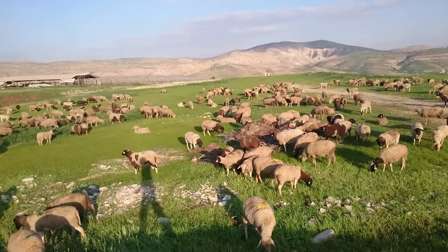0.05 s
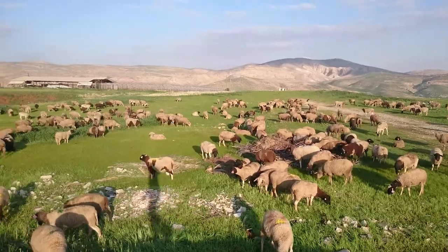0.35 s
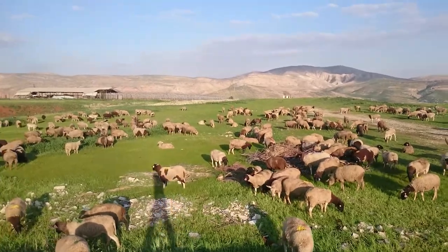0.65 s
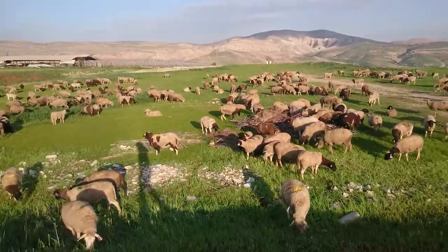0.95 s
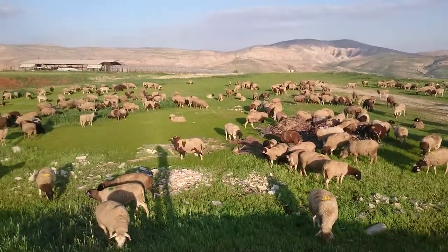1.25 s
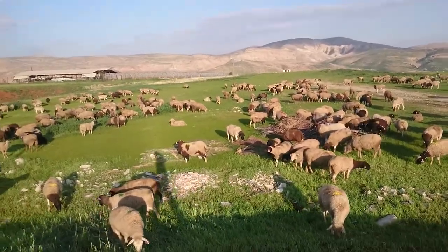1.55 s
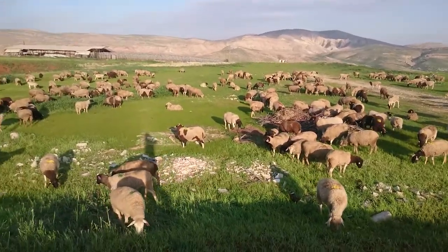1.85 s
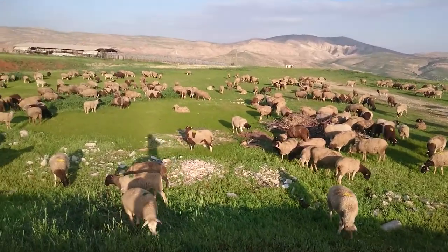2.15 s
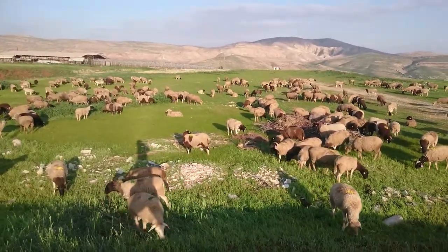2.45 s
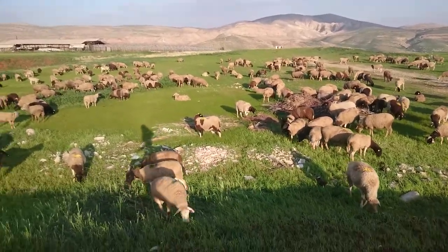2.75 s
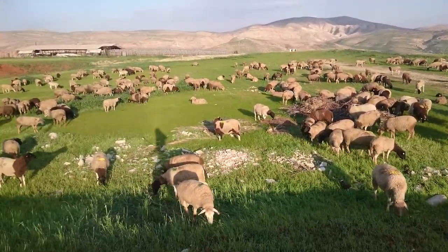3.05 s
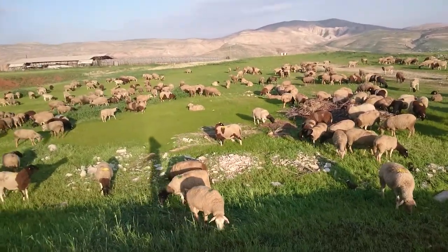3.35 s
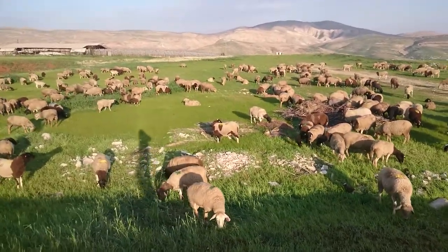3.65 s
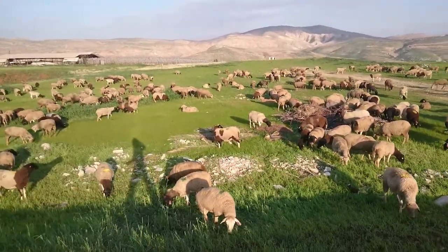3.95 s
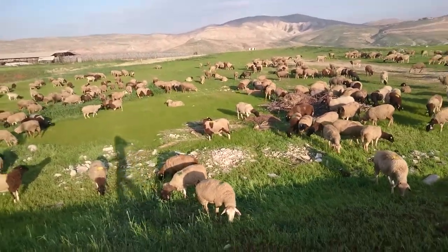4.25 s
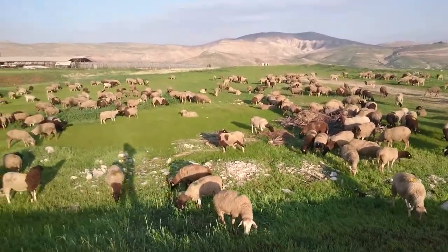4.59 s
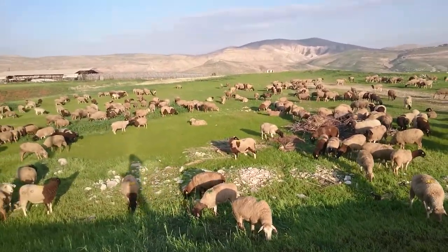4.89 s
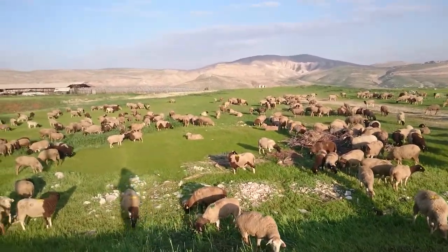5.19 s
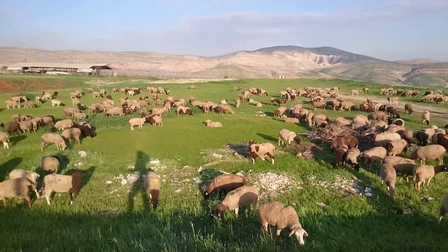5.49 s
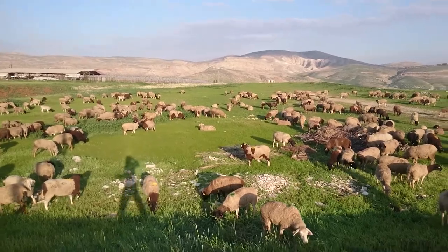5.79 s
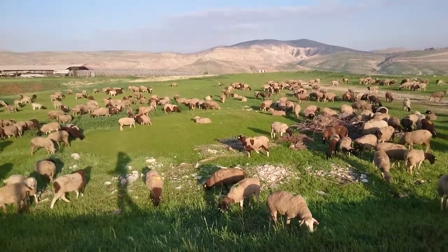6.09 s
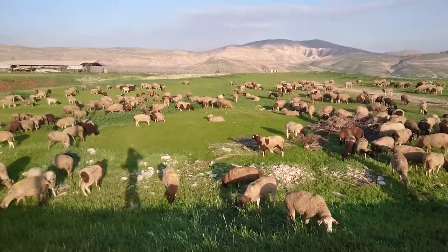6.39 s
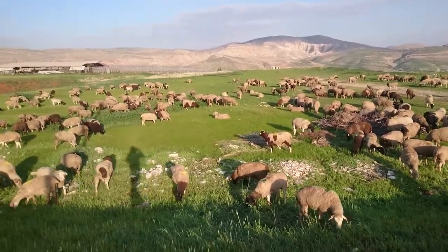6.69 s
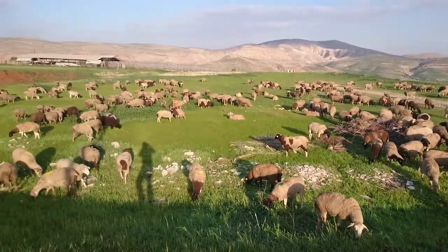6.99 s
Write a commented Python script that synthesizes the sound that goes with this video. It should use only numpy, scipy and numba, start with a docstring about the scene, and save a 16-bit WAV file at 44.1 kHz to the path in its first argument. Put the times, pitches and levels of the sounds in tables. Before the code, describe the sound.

Wind buffets the microphone and grass rustles underfoot as a few sheep bleat one after another, clear, hoarse, then deep.

```python
"""Three sheep bleat in turn on an open hillside, and others answer from far off.
Each bleat follows the source-filter principle: vocal fold pulses and breath noise excite the resonances
of the throat. A small bird whistles, and a walker's steps make grass swish by friction and stalks snap
by fracture. Behind them lies the hush of the air, while turbulent wind buffets two microphone ports."""
import sys
import numpy as np
from scipy import signal
from scipy.fft import rfft, irfft, next_fast_len
from scipy.io import wavfile
from scipy.ndimage import uniform_filter1d
from numba import njit

SR = 44100
rng = np.random.default_rng(int(sys.argv[2]) if len(sys.argv) > 2 else 0)


def store_wav(level_fs):
    """Save 16-bit WAV to argv[1]."""
    pcm = np.round(np.clip(np.atleast_2d(level_fs), -1, 1) * 32767)
    wavfile.write(sys.argv[1], SR, pcm.T.astype(np.int16))


N = 310023
TIME = np.arange(N) / SR
FFT_SIZE = next_fast_len(N)
BIN_HZ = np.fft.rfftfreq(FFT_SIZE, 1 / SR)


def from_db(db):
    """Amplitude grows tenfold for every 20 dB."""
    return 10 ** (np.asarray(db) / 20)


def unit_rms(x):
    """Normalisation to a mean power of one."""
    return x / np.sqrt(np.mean(x ** 2) + 1e-20)


def in_time(rows, t=TIME):
    """Linear interpolation of each column over the times in the first."""
    times_s, *columns = np.transpose(rows)
    return [np.interp(t, times_s, column) for column in columns]


def spectrum_db(points):
    """Interpolation of a spectrum on a log-frequency axis, one level per bin."""
    hz, db = np.transpose(points)
    return np.interp(np.log(np.maximum(BIN_HZ, 1)), np.log(hz), db)


def cut(x, hz, kind, order=2):
    """A Butterworth filter: maximally flat in its passband."""
    sections = signal.butter(order, np.clip(hz, 10, .45 * SR), kind, fs=SR, output="sos")
    return signal.sosfilt(sections, x + 1e-18)


def drift(rate_hz):
    """Random modulation: Gaussian values joined by straight lines."""
    knots = rng.standard_normal(int(N / SR * rate_hz) + 2)
    return np.interp(TIME * rate_hz, np.arange(len(knots)), knots)


def swell(start_s, length_s, attack_s, release_s):
    """An envelope of linear rise, hold and exponential decay."""
    t = TIME - start_s
    return np.clip(t / attack_s, 0, 1) * np.exp(-np.clip((t - length_s) / release_s, 0, 20))


def coloured(noise, spectrum):
    """Spectral shaping of a noise, returned at unit rms."""
    shaped = rfft(noise, FFT_SIZE) * from_db(spectrum_db(spectrum))
    return unit_rms(irfft(shaped, FFT_SIZE)[..., :N])


@njit
def two_pole(x, angle, radius):
    """A damped oscillator: pole angle sets its frequency, pole radius its decay."""
    y = np.zeros(len(x))
    for i in range(2, len(x)):
        drive = (1 - radius * radius) / 2 * (x[i] - x[i - 2])
        y[i] = drive + 2 * radius * np.cos(angle[i]) * y[i - 1] - radius * radius * y[i - 2]
    return y


def resonate(x, hz, width_hz):
    """A resonance of unit peak gain whose centre may glide."""
    return two_pole(x, 2 * np.pi * hz / SR * np.ones(len(x)), np.exp(-np.pi * width_hz / SR))


def add(out, start_s, sound):
    """Superposition of a short stereo sound on a longer one."""
    i = max(round(start_s * SR), 0)
    out[:, i:i + sound.shape[1]] += sound[:, :N - i]


def panned(pan_db):
    """Constant-power panning; pan_db is the left level minus the right."""
    gains = from_db(np.array([[.5], [-.5]]) * pan_db)
    return gains / np.sqrt(np.mean(gains ** 2, axis=0))


def at_ports(x, lead_ms, pan_db):
    """Path difference: direct sound reaches the left port first. The channels have opposite polarity."""
    n = np.arange(len(x))
    delayed = np.interp(n - lead_ms * SR / 1000, n, x)
    return np.array([x, -delayed]) * panned(pan_db)


# Balance of the ports for diffuse sound: frequency_hz, pan_db
PORT_BALANCE = [(300, -1), (1200, 1), (2200, -5.5), (3300, -1.5), (4700, 0.5), (6500, -9.5), (9000, -4.5),
                (13000, -2.5)]
def port_colour(x):
    """Diffuse-field response: each port colours the sound in its own way."""
    return irfft(rfft(x, FFT_SIZE) * panned(spectrum_db(PORT_BALANCE)), FFT_SIZE)[:, :N]


# Spectrum of still air over the field: frequency_hz, relative_db
AIR_SPECTRUM = [(88, 5), (150, -4.5), (248, -4), (436, -2.5), (1510, -2), (2230, -2.5), (3550, -5),
                (5440, -8.5), (6470, -3), (13000, -18.5), (15500, -11.5)]
def still_air(level_db=-63):
    """Ambient noise is diffuse: a steady hush, uncorrelated between the ports."""
    return from_db(level_db) * coloured(port_colour(rng.standard_normal((2, N))), AIR_SPECTRUM)


# Breeze on both ports: time_s, relative_db
BREEZE = [(0.0, -51), (0.35, -70.5), (0.96, -69), (1.09, -58.5), (1.55, -45), (2.19, -52.5), (2.62, -60),
          (3.76, -58), (4.78, -59.5), (5.66, -45), (6.03, -47.5), (6.42, -43), (6.72, -50), (7.03, -48)]
# Gusts, mostly on one port: start_s, length_s, relative_db, pan_db
GUSTS = [(0.0, 0.047, -43, -25), (.94, 0.14, -38, -14), (1.08, 0.072, -45, 4), (1.277, 0.21, -28, -12.5),
         (1.61, .06, -30, 21), (1.726, 0.52, -47.5, 9), (2.182, 0.041, -39, -8), (2.893, .05, -47, -14),
         (3.335, 0.098, -45.5, 11), (3.717, 0.28, -48, 11), (4.512, 0.09, -44.5, -14),
         (5.122, .05, -38, -13), (5.35, 0.031, -39, 3), (5.508, 0.075, -32.5, -9.5), (5.62, 0.089, -47, 13),
         (6.009, 0.04, -33, -13), (6.156, 0.23, -36, -19), (6.256, .11, -26, -30), (6.396, 0.17, -30, -19),
         (6.6, 0.16, -44, -19)]
# Spectrum of the wind's rumble: frequency_hz, relative_db
RUMBLE_SPECTRUM = [(13, -53), (22, -60), (48, 2.5), (71, 6), (130, -5), (274, -29.5), (445, -55),
                   (500, -28), (650, -74), (1100, -120)]
def wind(breeze_db=1, lump_db=4, rumble_db=-2, eddy_db=-15, eddy_growth=.074):
    """Turbulence rumbles at each port; stronger gusts shed smaller eddies that reach higher in pitch."""
    power = from_db(in_time(BREEZE)[0] + breeze_db) ** 2
    for start_s, length_s, db, pan_db in GUSTS:
        envelope = swell(start_s, length_s, attack_s=.021, release_s=.025)
        power = power + (from_db(db) * panned(pan_db) * envelope) ** 2
    level_db = 10 * np.log10(power)
    lumps = from_db(lump_db * np.array([drift(45), drift(45)]))
    rumble = from_db(rumble_db) * coloured(rng.standard_normal((2, N)), RUMBLE_SPECTRUM)
    eddies = unit_rms(cut(cut(rng.standard_normal((2, N)), 138, "high"), 160, "low", order=3))
    eddy_gain = from_db(eddy_db + eddy_growth * (level_db + 35))
    return from_db(level_db) * lumps * (rumble + eddy_gain * eddies)


# Eddies that strike a port: start_s, relative_peak_db, pan_db
BUFFETS = [(0.03, -30.5, -33), (0.971, -31, -18), (1.311, -22, -40), (1.347, -19, -35), (1.455, -17, -39),
           (1.625, -30, 3), (2.775, -35.5, -29), (3.334, -32, 34), (4.694, -36, -30), (5.522, -25.5, -28),
           (5.574, -28.5, 17), (5.852, -27.5, -28), (6.01, -24.5, -35), (6.217, -23.5, -34),
           (6.278, -21, -27), (6.327, -27, -17), (6.491, -24.5, -25), (6.722, -27.5, -16)]
def buffets(ring_hz=70, width_hz=61, edge_hz=282, edge_growth=.5, gain_db=-1.5):
    """Damped oscillation: a pressure jolt swings once or twice; harder ones have steeper edges."""
    out, impulse = np.zeros((2, N)), signal.unit_impulse(SR // 8, 2)
    for (start_s, db, pan_db), detune in zip(BUFFETS, rng.normal(1, .026, len(BUFFETS))):
        ring = resonate(impulse, ring_hz * detune, width_hz)
        top_hz = edge_hz * from_db(edge_growth * (db + 22))
        thump = cut(cut(ring, top_hz, "low", order=3), 78, "high")
        add(out, start_s, thump / np.abs(thump).max() * from_db(db + gain_db) * panned(pan_db))
    return out


# Strokes of the walker through the grass: start_s, length_s, swish_db, hiss_above_swish_db
STROKES = [(0.0, 0.071, -64, -7), (0.166, 0.097, -70.5, 6.5), (0.61, 0.057, -61.5, -5),
           (0.858, 0.21, -65, -0.5), (1.097, 0.12, -63, -0.5), (1.162, 0.038, -52, -7.5),
           (1.379, .29, -61, -6), (1.98, .08, -56, -10), (2.133, 0.09, -64, 0.5), (2.361, 0.17, -62, -7),
           (2.744, 0.069, -65.5, -1), (2.866, 0.037, -52.5, -21), (2.901, 0.03, -51, -13),
           (2.973, 0.16, -60.5, 2.5), (3.165, 0.27, -59, -2), (3.434, 0.27, -64.5, -20),
           (3.624, 0.089, -57.5, -9), (3.728, .27, -62.5, -3.5), (4.29, 0.099, -62.5, 3),
           (4.408, .22, -56, 0), (4.684, 0.22, -63, -8), (4.812, 0.11, -57.5, -1), (4.983, 0.11, -55.5, -9),
           (5.17, 0.19, -59.5, -27), (5.985, 0.097, -58.5, -2), (6.112, 0.32, -56.5, -8),
           (6.217, 0.19, -55.5, -4), (6.437, 0.16, -58, -3.5), (6.661, 0.09, -66, -9),
           (6.898, 0.14, -69, -1)]
# Spectrum of rubbing blades: frequency_hz, relative_db
BLADE_SPECTRUM = [(410, -69), (700, -11.5), (980, -21), (2050, 0.5), (3870, 2.5), (4410, -2), (6420, -1),
                  (9230, -16), (15500, -23.5)]
def grass(rustle_db=-68.5, grain_db=1.5, flutter_db=2.17, sway_db=1, ticks_per_s=45, tick_db=-6.5):
    """Friction of blades is a dense run of tiny contacts, a few sharp; a faster brush adds hiss."""
    swish_power, hiss_power = from_db(rustle_db) ** 2, from_db(rustle_db - 10) ** 2   # between strokes
    for start_s, length_s, swish_db, hiss_db in STROKES:
        power = (from_db(swish_db) * swell(start_s, length_s, attack_s=.031, release_s=.057)) ** 2
        swish_power = swish_power + power
        hiss_power = hiss_power + power * from_db(hiss_db) ** 2
    ticks = (rng.random(N) < ticks_per_s / SR) * rng.exponential(1, N)
    crackle = from_db(tick_db) * signal.lfilter([1], [1, -np.exp(-1000 / SR)], ticks + 1e-18)   # 1 ms decay
    grains = rng.standard_normal((2, N)) * (1 + crackle)
    grains *= from_db(grain_db * drift(1500) + flutter_db * drift(90) + sway_db * drift(25))
    blades = coloured(port_colour(grains), BLADE_SPECTRUM)
    swish = cut(blades, 9600, "low", order=4) / np.std(cut(blades, [3800, 9000], "band"))
    hiss = unit_rms(cut(blades, 9700, "high", order=4))
    return from_db(.04) * np.sqrt(swish_power) * swish + np.sqrt(hiss_power) * hiss


# Breaking stalks: start_s, relative_peak_db, pitch_hz
SNAPS = [(0.882, -37.5, 6600), (1.102, -43.5, 6600), (1.285, -33.5, 6650), (1.511, -44, 6700),
         (1.715, -48.5, 3890), (1.7492, -45.5, 3580), (1.82, -46, 1910), (1.8515, -50.5, 2180),
         (2.33, -48, 6860), (2.612, -49, 5000), (2.806, -47, 6440), (3.21, -42, 6560), (3.227, -42, 6200),
         (2.8803, -43.5, 2490), (4.2337, -43.5, 6340), (4.275, -44, 6200), (4.3211, -38, 6360),
         (4.3325, -38, 3140), (4.493, -42, 3180), (5.7303, -50.5, 2220), (6.0173, -42, 3010),
         (6.2495, -28.5, 7100), (6.287, -34.5, 6600)]
def snaps(attack_s=.0003, crack_t60_s=.016, tail_t60_s=.13, tail_db=-13.5, body_db=-11, gain_db=2.5):
    """Fracture: a stalk breaks with a resonant crack, then its fibres crackle briefly."""
    out, t = np.zeros((2, N)), np.arange(SR // 15) / SR
    decay = from_db(-60 * t / crack_t60_s) + from_db(tail_db - 60 * t / tail_t60_s)
    envelope = decay * (1 - np.exp(-t / attack_s))
    for start_s, db, pitch_hz in SNAPS:
        burst = rng.standard_normal((2, len(t))) * envelope
        crack = cut(cut(burst, 2000, "high"), 4000, "low", order=1)
        ring = np.array([resonate(side, pitch_hz, width_hz=1200) for side in crack])
        snap = ring + from_db(body_db) * crack
        add(out, start_s, snap / np.abs(snap.mean(axis=0)).max() * from_db(db + gain_db))
    return port_colour(out)


def scattering(direct, t60_s=.35, wet_db=-24):
    """Scattering from ground and flock adds a faint, exponentially decaying tail."""
    t = np.arange(SR // 2) / SR
    tail = rng.standard_normal((2, len(t))) * from_db(-60 * t / t60_s) * (t > .004)
    tail /= np.sqrt(np.sum(tail ** 2) / 2)
    return direct + from_db(wet_db) * signal.fftconvolve(direct, tail, axes=1)[:, :N]


# The bird's chirps: start_s, relative_db
CHIRPS = [(0.243, -71), (0.381, -66), (0.522, -61), (2.656, -62.5), (2.783, -66), (6.928, -69)]
# Contour of one chirp: elapsed_s, pitch_hz, gain_db
CHIRP_SHAPE = [(0, 4200, 4), (.006, 4820, 15), (.013, 4560, 10), (.02, 4850, 9.5), (.027, 5300, -20)]
def bird():
    """Frequency modulation of a pure tone: short whistles that rise with a kink."""
    out, t = np.zeros((2, N)), np.arange(0, CHIRP_SHAPE[-1][0], 1 / SR)
    pitch_hz, gain_db = in_time(CHIRP_SHAPE, t)
    for (start_s, db), detune in zip(CHIRPS, rng.normal(1, .003, len(CHIRPS))):
        whistle = from_db(db + gain_db) * np.sin(2 * np.pi * np.cumsum(pitch_hz * detune) / SR)
        add(out, start_s, at_ports(whistle, lead_ms=.295, pan_db=-1))
    return out


# Brief catches of the voice: centre_s, length_s, pitch_lost_fraction, level_lost_db
CATCHES = [(3.03, 0.05, 0.066, -1), (3.595, 0.048, 0.055, 1.5), (3.662, 0.035, 0.078, 0.5),
           (3.737, 0.037, 0.15, 7), (4.706, 0.051, 0.026, 14), (4.929, 0.0414, 0.0698, 2.5),
           (4.97, 0.0253, .03, 0), (5.015, 0.045, 0.08, 2), (5.058, 0.044, 0.0763, 0.5),
           (5.197, 0.035, 0.043, 0), (6.209, .07, 0.021, 8), (6.373, 0.086, 0.0372, 0.5)]
def phrasing(voice, t, attack_s=.03006, release_s=.034, slack_db=16.5):
    """Modulation of a call: its slack ends are lower, softer and rougher, and catches make it quaver."""
    pitch_hz, level_db, roughness, mouth_hz = in_time(voice, t)
    slack = np.maximum(1 - (t - t[0]) / attack_s, 0) + np.maximum(1 - (t[-1] - t) / release_s, 0)
    sag = .1069 * slack
    level_db -= slack_db * slack
    roughness += .28 * slack
    for centre_s, length_s, pitch_lost, lost_db in CATCHES:
        dip = np.cos(np.pi * np.clip((t - centre_s) / length_s, -.5, .5)) ** 2
        sag += pitch_lost * dip
        level_db -= lost_db * dip
        roughness += 3.6 * pitch_lost * dip
        mouth_hz *= 1 - .42 * pitch_lost * dip
    return pitch_hz * (1 - sag), level_db, np.clip(roughness, 0, 1), mouth_hz


def vocal_folds(pitch_hz, roughness, lag_cycles, rasp, rasp_hz, jitter=.026, shimmer_db=2.3):
    """Phonation: harmonic pulses, which roughness makes uneven in time and size and mixes with breath."""
    size = len(pitch_hz)
    cycles = np.cumsum(pitch_hz * (1 + jitter * roughness * drift(260)[:size])) / SR
    harmonic = np.arange(1, 33)[:, None]
    # higher partials lag a little, which softens each pulse
    pulses = np.cos(2 * np.pi * (harmonic * cycles - lag_cycles * harmonic ** 2)).sum(axis=0)
    shimmer = from_db(shimmer_db * roughness * rng.standard_normal(400)[np.round(cycles).astype(int)])
    turbulence = cut(rng.standard_normal(N)[:size], rasp_hz, "high", order=1)
    puffs = turbulence * np.cos(np.pi * cycles) ** 2   # air passes while the folds are open
    return shimmer * (unit_rms(pulses) + rasp * roughness * puffs), cycles


# Upper, nasal resonances of every throat: centre_hz, width_hz
NASAL_FORMANTS = [(3370, 280), (4680, 560)]
def vocal_tract(source, throat, mouth_hz, low_hz, top_hz, nasal_db):
    """Formants are resonances in parallel; the first of the throat is centred on the moving mouth_hz."""
    oral = 0
    for row, (centre_hz, width_hz, db) in enumerate(throat):
        hz = mouth_hz if row == 0 else centre_hz
        # each resonance acts twice, which keeps the valleys between them dark
        oral += from_db(db) * resonate(resonate(source, hz, width_hz), hz, width_hz)
    treble = cut(source, [3200, 5600], "band")
    nasal = sum(from_db(db) * resonate(treble, hz, width_hz)
                for db, (hz, width_hz) in zip(nasal_db, NASAL_FORMANTS))
    return cut(cut(oral, low_hz, "high"), top_hz, "low", order=12) + nasal


def bleat(voice, throat, low_hz, top_hz, nasal_db, chest_db, lead_ms, pan_db,
          lag_cycles=.009, rasp=1.55, rasp_hz=300):
    """Source and filter: the folds excite the tract, and the chest adds the fundamental."""
    out, t = np.zeros((2, N)), np.arange(voice[0][0], voice[-1][0], 1 / SR)
    pitch_hz, level_db, roughness, mouth_hz = phrasing(voice, t)
    source, cycles = vocal_folds(pitch_hz, roughness, lag_cycles, rasp, rasp_hz)
    vowel = vocal_tract(source, throat, mouth_hz, low_hz, top_hz, nasal_db)
    chest = from_db(chest_db) * np.sin(2 * np.pi * cycles)
    call = at_ports(vowel + chest, lead_ms, pan_db)
    running_rms = np.sqrt(uniform_filter1d(call.mean(axis=0) ** 2, SR // 40) + 1e-12)
    add(out, t[0], call / running_rms * from_db(level_db) * signal.windows.tukey(len(t), .03))
    return out


# Distant bleats: start_s, length_s, pitch_hz, level_db, roughness, formant_hz, lead_ms, pan_db
FAR_CALLS = [(2.3, 0.94, 183.4, -71.5, 1.1, 1120, .6, -1), (5.802, 0.35, 191, -65, 0.73, 1970, 0.38, -7)]
def far_sheep(swell_db=9, swell_fraction=.34, width_hz=340):
    """Attenuation over distance leaves one rough resonance of each slowly swelling answer."""
    out = np.zeros((2, N))
    for start_s, length_s, pitch_hz, level_db, roughness, formant_hz, lead_ms, pan_db in FAR_CALLS:
        voice = [(start_s + fraction * length_s, pitch_hz, level_db - under_db, roughness, formant_hz)
                 for fraction, under_db in [(0, swell_db), (swell_fraction, 0), (1, 0)]]
        out += bleat(voice, [(formant_hz, width_hz, 0)], low_hz=400, top_hz=2800, nasal_db=(-43, -43),
                     chest_db=-50, lead_ms=lead_ms, pan_db=pan_db, rasp=3.8)
    return out


# Contours of the near calls: time_s, pitch_hz, level_db, roughness, mouth_hz
CLEAR_VOICE = [(2.962, 240.6, -43.5, .38, 2160), (3.07, 228.7, -40.5, .42, 2260),
               (3.115, 263.7, -36.5, .26, 2240), (3.24, 279.8, -31.7, .16, 2330),
               (3.38, 281, -30.4, .12, 2280), (3.57, 280, -32.3, .12, 2310),
               (3.64, 280.3, -32.5, 0.24, 2395), (3.72, 271.6, -33, 0.23, 2450),
               (3.808, 251.7, -35.5, 0.77, 2440)]
MUTTER_VOICE = [(4.64, 172.4, -53.5, 0.25, 2040), (4.76, 187.2, -56, 0.84, 1950),
                (4.86, 179.4, -54, 0.67, 1930)]
HOARSE_VOICE = [(4.864, 198.4, -39.5, 0.9, 2400), (4.95, 208, -37, 1, 2520),
                (5.03, 220.6, -36.5, 0.4, 2410), (5.12, 206.4, -35.5, 0.5, 2366),
                (5.18, 204.1, -38.5, 0.15, 2374), (5.272, 171.2, -38, 0.83, 2530)]
DEEP_VOICE = [(6.135, 147.7, -53, .8, 2200), (6.3, 157, -52, 0.2, 2210), (6.43, 159.5, -49, 0.33, 2230),
              (6.54, 151, -50, 0.19, 2300), (6.615, 148.6, -51, .35, 2480)]
# Formants of each throat, the mouth at rest first: centre_hz, width_hz, gain_db
CLEAR_THROAT = [(2300, 412, 13), (2623, 420, -2.5), (1395, 175, 11), (776, 370, 1), (570, 220, 0)]
MUTTER_THROAT = [(2000, 220, 10.5), (1730, 200, 1), (990, 360, 3), (177, 84, 14)]
HOARSE_THROAT = [(2450, 194, 14), (2555, 590, 3.5), (2162, 110, 11), (1727, 230, 9.5), (1532, 140, 7),
                 (1007, 100, -4), (750, 234, 11.5), (715, 87, 3)]
DEEP_THROAT = [(2200, 300, 15.5), (2650, 350, 15), (3300, 370, 9.5), (1800, 210, 6.5), (765, 210, -3)]
def near_sheep():
    """Pitch and formants mark each voice: a clear bleat, a mutter opening into a hoarse one, a deep one."""
    clear = bleat(CLEAR_VOICE, CLEAR_THROAT, low_hz=300, top_hz=2700, nasal_db=(-19, -24),
                  chest_db=-29, lead_ms=.15, pan_db=-2, lag_cycles=.0124)
    mutter = bleat(MUTTER_VOICE, MUTTER_THROAT, low_hz=120, top_hz=2900, nasal_db=(-40, -40),
                   chest_db=-22, lead_ms=.2, pan_db=-1)
    hoarse = bleat(HOARSE_VOICE, HOARSE_THROAT, low_hz=388, top_hz=3180, nasal_db=(-17, -9),
                   chest_db=-14, lead_ms=.23, pan_db=-3, lag_cycles=.028, rasp_hz=1390)
    deep = bleat(DEEP_VOICE, DEEP_THROAT, low_hz=800, top_hz=3800, nasal_db=(-12, -24),
                 chest_db=-40, lead_ms=.3, pan_db=-7, lag_cycles=.00867)
    return clear + mutter + hoarse + deep


def scene():
    """Superposition of animals in the open, grass underfoot, wind and still air."""
    animals = scattering(near_sheep() + far_sheep() + bird())
    return animals + grass() + snaps() + wind() + buffets() + still_air()


def record(dry):
    """Band limiting: an elliptic low-pass cuts steeply above 15.9 kHz."""
    return signal.sosfilt(signal.ellip(12, .1, 80, 15900, fs=SR, output="sos"), dry)


dry = scene()
out = record(dry)
store_wav(out)
```